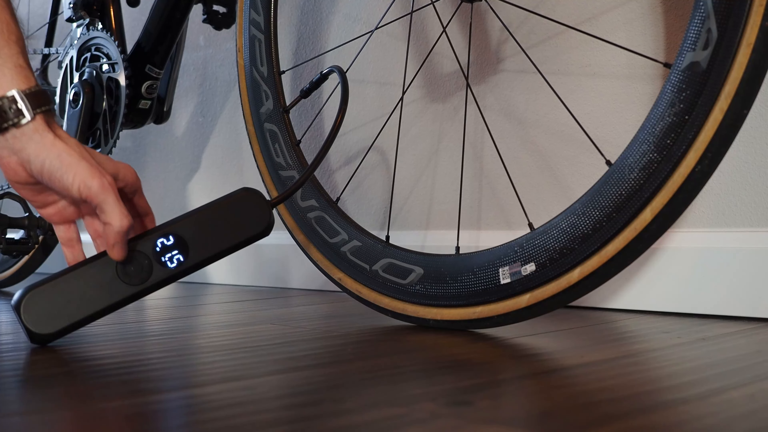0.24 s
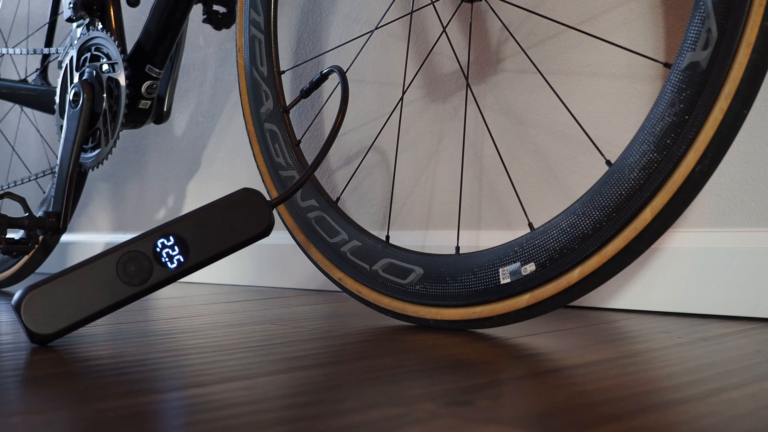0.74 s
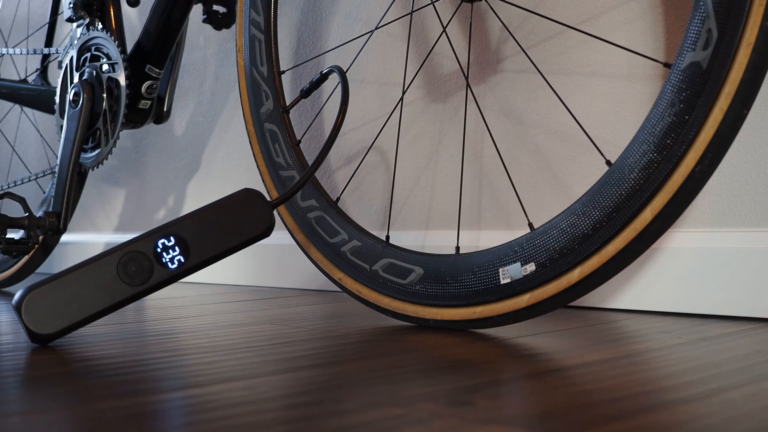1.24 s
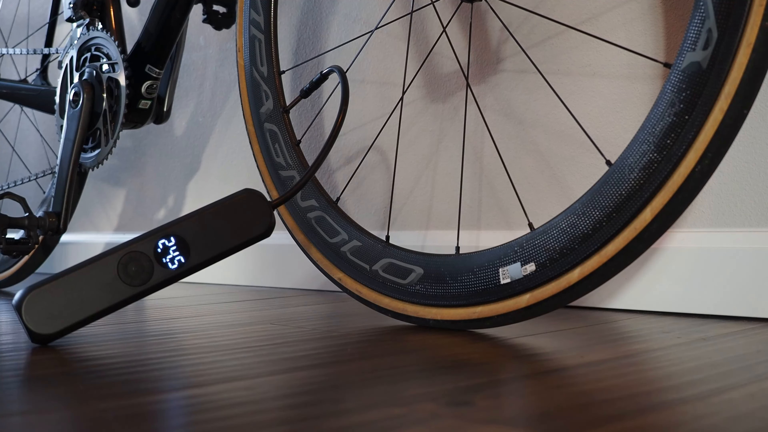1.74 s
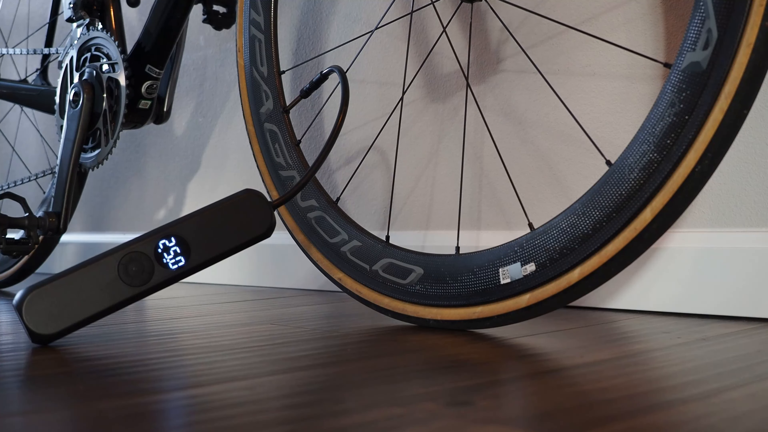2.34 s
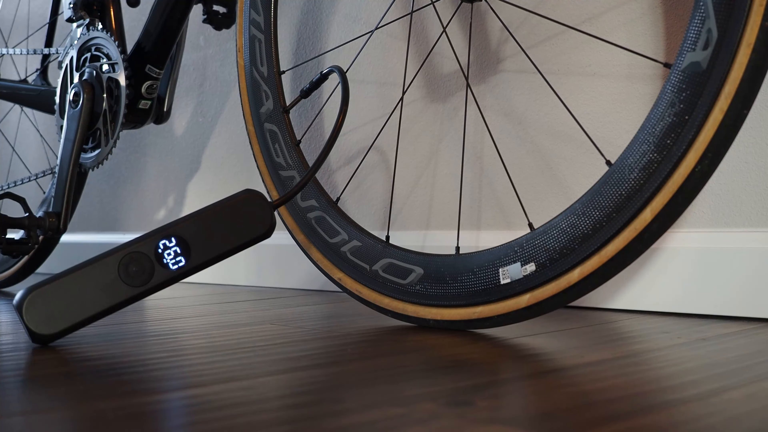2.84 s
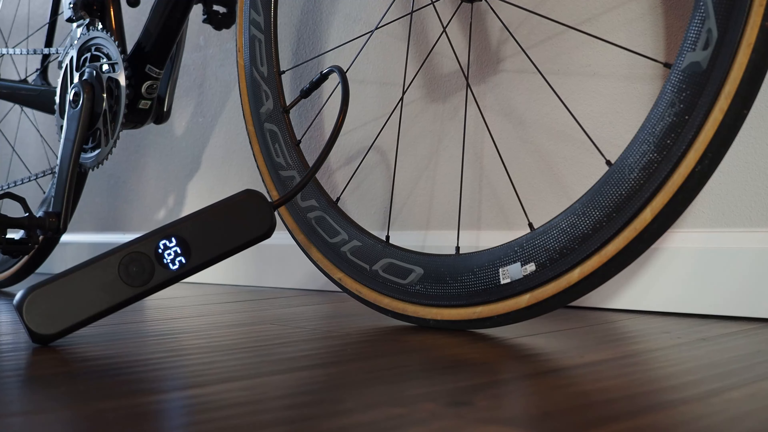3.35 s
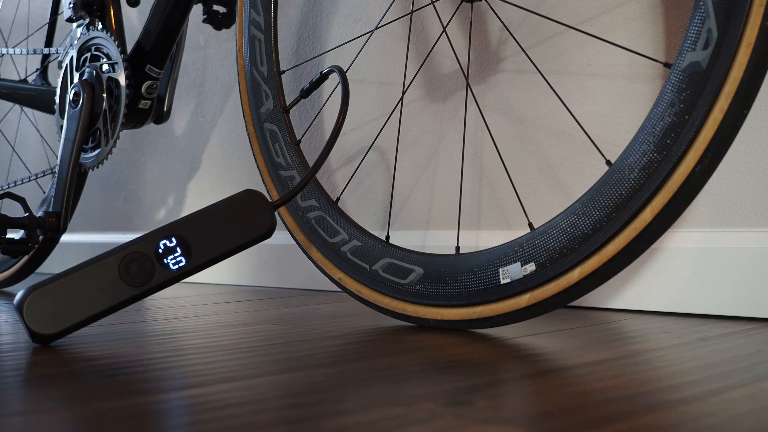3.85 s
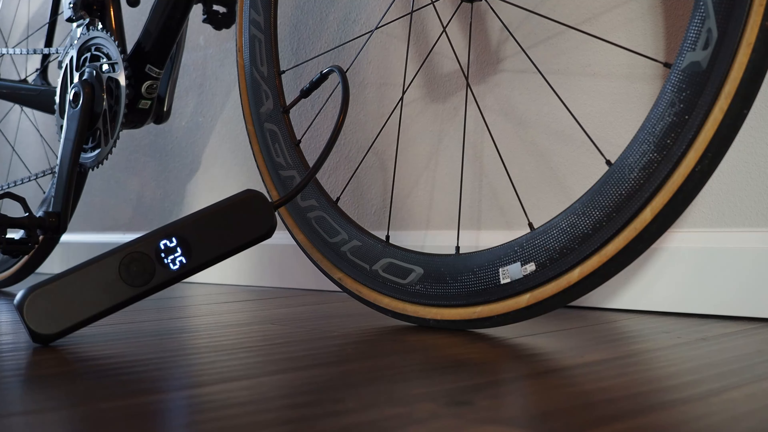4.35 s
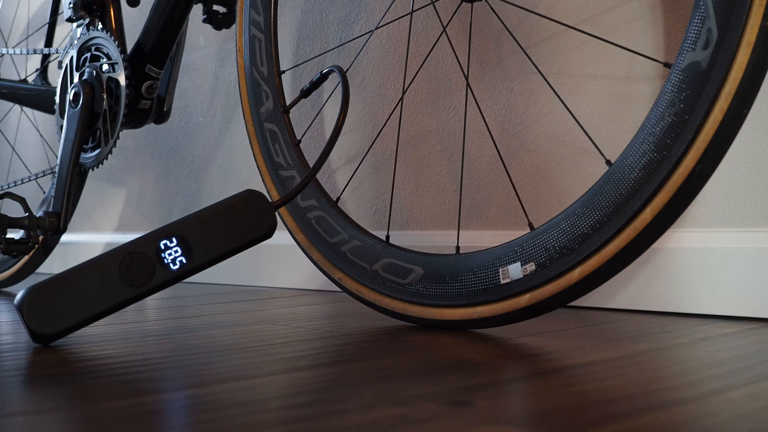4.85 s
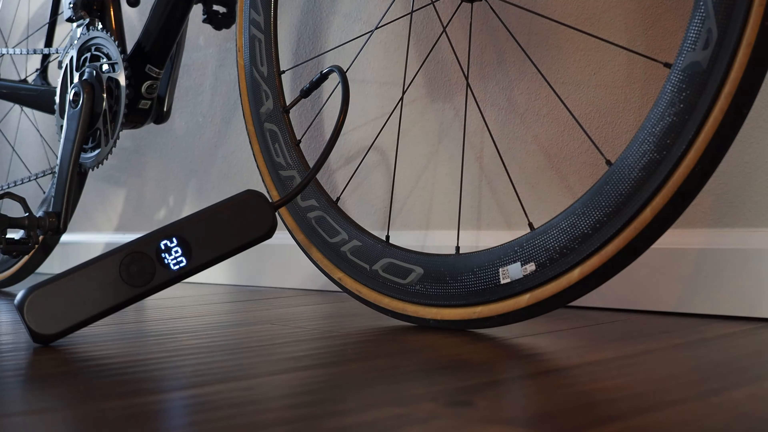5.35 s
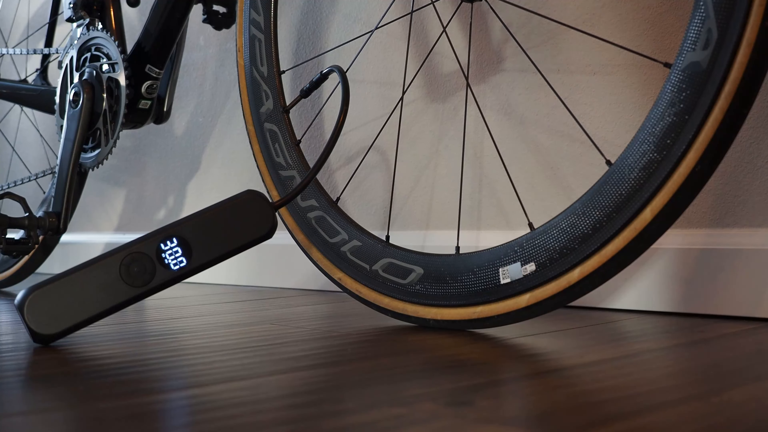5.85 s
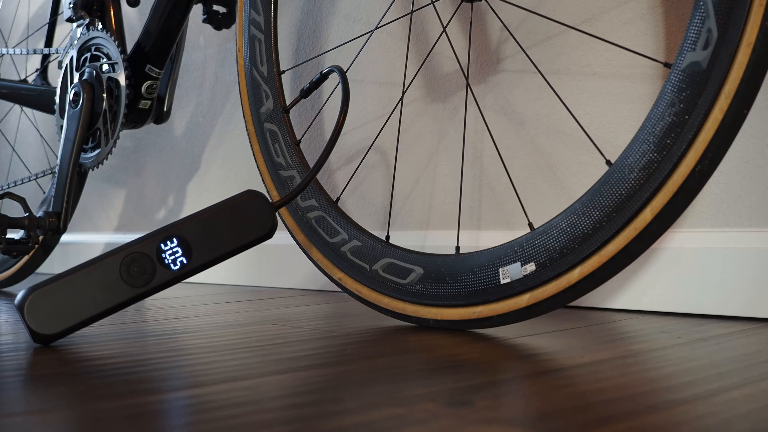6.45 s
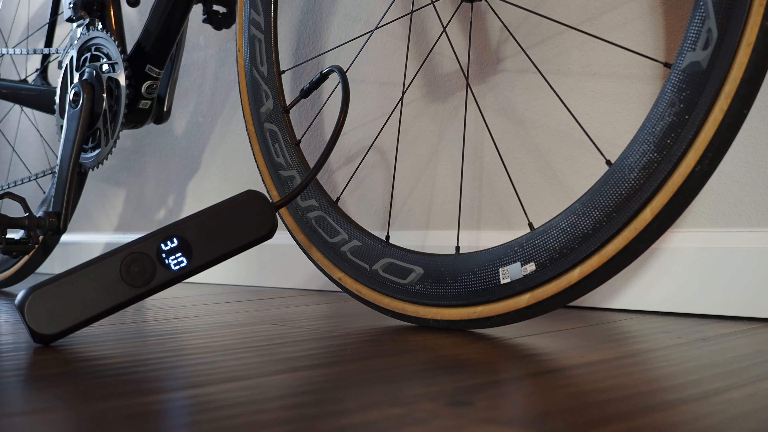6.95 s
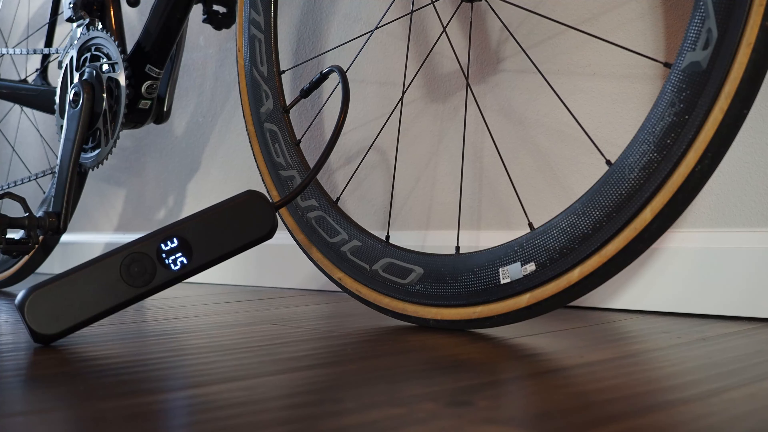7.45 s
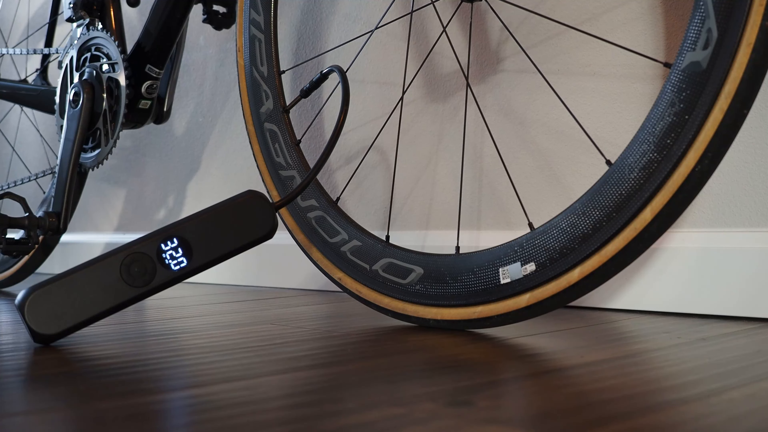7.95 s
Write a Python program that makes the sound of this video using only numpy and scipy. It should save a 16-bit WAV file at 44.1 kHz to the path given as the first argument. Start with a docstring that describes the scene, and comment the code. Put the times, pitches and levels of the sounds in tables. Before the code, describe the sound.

A small cordless tyre inflator runs steadily up close, a loud buzzing gear whine with rapid piston knocking, gritty grinding and airy hiss throughout.

```python
"""A whine swells and dips in pitch about 39 times a second: a cordless tyre inflator on a wooden floor fills a tyre.
Its motor drives a piston through a gear; each compression loads the teeth and bends the shaft speed.
The piston knocks in the plastic case, sliding parts grind, air hisses and whistles through the valves.
A hand lets go early on, which thins the drone of the case; dull low bumps and a floor of noise lie below."""
import sys
import numpy as np
from scipy import signal
from scipy.fft import rfft, irfft, next_fast_len
from scipy.io import wavfile
from scipy.ndimage import map_coordinates

SR = 44100
rng = np.random.default_rng(int(sys.argv[2]) if len(sys.argv) > 2 else 0)


def bounce(signal):
    """Save signal as a 16-bit WAV file at the path given by the first command-line argument."""
    frames = np.transpose(np.atleast_2d(signal))
    limited = np.clip(frames, -1, 1)
    pcm = np.round(limited * 32767).astype(np.int16)
    wavfile.write(sys.argv[1], SR, pcm)


N = 361619
TIME_S = np.arange(N) / SR

# crank speed: (time [s], speed [turns/s])
CRANK_SPEED = [(0.0, 39.751), (1.9, 38.545), (2.0, 37.904), (2.1, 38.52), (3.3, 38.707), (3.4, 39.016),
               (3.8, 38.402), (4.2, 39.027), (4.3, 38.482), (6.1, 38.464), (7.0, 38.568), (8.2, 38.254)]
# piston and rod knocks in each turn: (phase [turn], thud [dB], tick [dB]), levels relative
KNOCKS = [(.49, -6, 0), (.61, -6, -9), (.71, -5, -7), (.8, 0, -1), (.88, -6, -9)]
# case shaking before the effort tilt: (crank order, level [dB])
CASE_SHAKE = [(1, -57.5), (2, -52), (3, -61.5), (4, -54.5), (5, -52.5), (6, -63), (7, -57.5), (9, -58.5),
              (11, -51), (12, -50), (13, -58.5), (14, -54.5), (16, -53.5), (17, -53), (18, -47), (19, -51),
              (20, -51), (21, -47.5), (27, -42.5), (28, -43.5), (30, -44.5)]
# extra drone while the hand holds the case, untouched by the effort tilt: (crank order, level [dB])
GRIP_SHAKE = [(6, -55), (7, -49.5), (10, -54), (13, -50), (17, -54), (19, -46), (21, -46)]
# resonances: (frequency [Hz], width [Hz], relative level [dB])
GEARBOX_MODES = [(1353, 305, -4), (1404, 128, 3), (1580, 93, 1), (1845, 84, 4)]
CASE_MODES = [(679, 32.6, 0), (818, 63, -8), (925, 47, -1.5), (1085, 91, 3), (1182, 104, 0.5),
              (1331, 75, -4.5)]
# relative spectra: (frequency [Hz], density [dB/Hz])
GRIND_SPECTRUM = [(1800, 12), (2100, 6), (2380, -4.5), (2550, 3.5), (2820, -8), (3000, 3), (3280, 4.5),
                  (3530, -11.5), (3750, 2), (4050, -12), (4450, 2.5), (4950, -11), (5550, -2.5),
                  (6200, -36)]
AIR_SPECTRUM = [(2000, 6.5), (5500, 0.5), (6600, -8), (7600, 2), (8600, -2), (9300, 0.5), (10300, -6.5),
                (12000, -2), (13000, -2), (14000, -8), (15400, -2.5), (16000, -10)]
FLOOR_SPECTRUM = [(15, -3), (45, -2), (100, -17), (200, 4), (350, -0.5), (520, 2.5), (700, 2), (1100, 3.5),
                  (2000, -22)]
# how the case passes the whine and its overtones: (frequency [Hz], relative gain [dB])
WHINE_BODY = [(1250, 0.5), (1340, 10.5), (1460, -2.5), (1540, -2), (1650, -2), (1730, 0), (1820, 0),
              (1900, -4.5), (1980, -12), (2200, 6.5)]
OVERTONE_BODY = [(3100, -34), (3300, 13), (3600, -17), (4900, -9), (5350, 8.5), (5650, 4), (6000, -8)]
# dull bumps: (onset [s], envelope peak [dB], pitch [Hz])
BUMPS = [(1.95, -36, 40), (2.82, -35, 36.5), (2.96, -41, 42), (3.48, -38, 52), (4.021, -32, 49),
         (4.85, -39, 42), (6.06, -45, 60), (7.1, -44, 44), (7.62, -36, 48)]
# gear rebounds after compression: (phase [turn], width [turns], tooth load [dB], relative speed jolt [share])
REBOUNDS = [(0.719, 0.017, -22, 0.13), (0.861, 0.036, -18, -0.1)]
# level swells, one per turn: (phase [turn], width [turns], swing [dB])
VALVE_SWELL = (0.41, .14, 2.6)
INTAKE_SWELL = (0.33, 0.12, 5.6)

TEETH = 44
LET_GO_S, LET_GO_FADE_S = 0.7, 0.05
CUTOFF_HZ = 15650
# effort rises with tyre pressure and levels off
EFFORT_TAU_S = 1.6
GEARS_DB, GEARS_WAVER_DB = -15, 0.23
# level at full effort, and its rise up to there
KNOCK_DB, KNOCK_RISE_DB = -30.5, 4.0
GRIND_DB, GRIND_RISE_DB = -27, 10
AIR_DB, AIR_RISE_DB = -32.5, -3.5
# tooth load: compression peak, build-up around it, idling
PEAK_WIDTH_TURNS, BUILD_WIDTH_TURNS = 0.064, 0.17
PEAK_DB, BUILD_DB, IDLE_DB = -1.4, -15.5, -24.5
# shaft fast into compression, slow out of it; the largest deviation is 0.61 of the scale
SAG_AT_TURN, SAG_WIDTH_TURNS, SAG_SCALE = 0.52, 0.1424, 0.14
RATTLE_DUCK_DB = 1.5
# tilt per unit of effort; zero tilt at the reference effort, above full effort (1)
SHAKE_TILT_DB_PER_ORDER, SHAKE_REF_EFFORT = 0.2, 1.5
SHAKE_WAVER_DB = 1.67


def from_db(db):
    """Amplitude ratio of a level in dB."""
    return 10 ** (np.asarray(db) / 20)


def rms_one(x):
    """Scale to rms 1, over all channels together."""
    return x / np.sqrt(np.mean(x ** 2) + 1e-20)


def colour(x, spectrum):
    """Filter by a spectrum that falls steeply beyond its ends; rms 1."""
    hz, db = np.transpose(spectrum)
    size = next_fast_len(N)
    log_hz = np.log(np.maximum(np.fft.rfftfreq(size, 1 / SR), 1))
    outside = np.abs(log_hz - np.clip(log_hz, np.log(hz[0]), np.log(hz[-1])))
    gain = from_db(np.interp(log_hz, np.log(hz), db) - 100 * outside)
    return rms_one(irfft(rfft(x, size) * gain, size)[..., :N])


def resonate(x, modes):
    """Parallel two-pole resonances with alternating signs; rms 1."""
    out = 0
    for k, (hz, width_hz, db) in enumerate(modes):
        radius = np.exp(-np.pi * width_hz / SR)
        zeros = [(1 - radius ** 2) / 2, 0, (radius ** 2 - 1) / 2]
        poles = [1, -2 * radius * np.cos(2 * np.pi * hz / SR), radius ** 2]
        out = out + (-1) ** k * from_db(db) * signal.lfilter(zeros, poles, x)
    return rms_one(out)


def band(x, low_hz, high_hz):
    """Band-pass; rms 1."""
    sos = signal.butter(2, [low_hz, high_hz], "band", fs=SR, output="sos")
    return rms_one(signal.sosfilt(sos, x))


def drift(rate_hz):
    """Random values at the given rate, joined by straight lines; rms 1."""
    return rms_one(np.interp(TIME_S * rate_hz, np.arange(N), rng.standard_normal(N)))


def pan(x, left_minus_right_db):
    """Stereo pair with a level difference."""
    return x * from_db(np.array([[left_minus_right_db], [-left_minus_right_db]]) / 2)


def scatter(x, wet_db, t60_s):
    """Short spray of reflections off floor, wall and wheel, different at each side; rms 1."""
    age_s = np.arange(SR // 8) / SR
    spray = rng.standard_normal((2, len(age_s))) * from_db(-60 * age_s / t60_s)
    spray *= from_db(wet_db) / np.sqrt(np.sum(spray ** 2, axis=1, keepdims=True))
    paths = 1 + rfft(spray)
    paths /= np.abs(paths) ** .7  # flatten most of the colouring
    response = np.fft.fftshift(irfft(paths), axes=1)
    start = response.shape[1] // 2
    return rms_one(signal.fftconvolve(np.atleast_2d(x), response, axes=1)[:, start:start + N])


def rubbing(turns, repeat, channels=1):
    """Roughness noise: power share `repeat` recurs every turn, the rest is fresh in each channel."""
    surface = irfft(np.exp(2j * np.pi * rng.random(513)))
    position = turns % 1 * len(surface)
    worn = rms_one(map_coordinates(surface, [position], order=3, mode="wrap"))
    fresh = rng.standard_normal((channels, N))
    return np.sqrt(repeat) * worn + np.sqrt(1 - repeat) * fresh


def bell(turns, centre, width):
    """Gaussian swell of height 1, once per turn."""
    return np.exp(-.5 * (((turns - centre + .5) % 1 - .5) / width) ** 2)


def tooth_load(turns):
    """Relative force on the teeth: build-up, compression peak, rebounds."""
    load = from_db(IDLE_DB) + from_db(BUILD_DB) * bell(turns, 0.46, BUILD_WIDTH_TURNS)
    load = load + from_db(PEAK_DB) * bell(turns, 0.52, PEAK_WIDTH_TURNS)
    return load + sum(from_db(db) * bell(turns, at, width) for at, width, db, _ in REBOUNDS)


def shaft_speed(turn):
    """Relative speed within a turn: fast into compression, slow out, jolted by each rebound."""
    offset = (turn - SAG_AT_TURN) / SAG_WIDTH_TURNS
    sag = SAG_SCALE * offset * bell(turn, SAG_AT_TURN, SAG_WIDTH_TURNS)
    return 1 - sag + sum(jolt * bell(turn, at, width) for at, width, _, jolt in REBOUNDS)


def gear_whine(turns):
    """Teeth mesh at the momentary shaft speed; load sets the strength of the tone and two overtones."""
    grid = np.linspace(0, 1, 1000)
    travel = np.cumsum(shaft_speed(grid))
    shaft_turn = np.interp(turns % 1, grid, travel / travel[-1])
    mesh_rad = 2 * np.pi * TEETH * shaft_turn + .1 * drift(300)
    # load timing and strength waver
    load = tooth_load(turns + .005 * drift(30)) * from_db(.25 * drift(25))
    rough_rad = mesh_rad + .33 * drift(700)
    partials = from_db(-7.5) * np.sin(2 * rough_rad) + np.sin(3 * rough_rad)
    overtones = scatter(colour(load * partials, OVERTONE_BODY), wet_db=0, t60_s=.009)
    fundamental = colour(load * np.sin(mesh_rad), WHINE_BODY)
    return fundamental + from_db(-23.5 + .8 * drift(15)) * overtones


def gear_rattle(turns):
    """Worn teeth chatter in the gearbox, least while loaded."""
    level_db = -RATTLE_DUCK_DB * bell(turns, 0.4, .1)
    chatter = from_db(level_db + 1.5 * drift(40)) * rubbing(turns, repeat=.1)
    return scatter(band(resonate(chatter, GEARBOX_MODES), 1080, 2270), wet_db=-7, t60_s=0.033)


def knocks(turns, column, spread_db):
    """One click per table row and turn, uneven in strength and timing."""
    clicks, count = np.zeros(N), np.arange(int(turns[-1]) + 1)
    for row in KNOCKS:
        late, hard = rng.standard_normal((2, len(count)))
        at = np.interp(count + row[0] + .003 * late, turns, np.arange(N)).astype(int)
        clicks[at] += from_db(row[column] + spread_db * hard)
    clicks[[0, -1]] = 0  # drop clicks that fall outside
    return clicks


def piston(turns):
    """Knocks and sliding friction ring in the plastic case."""
    thuds = rms_one(knocks(turns, column=1, spread_db=2.5))
    drive = thuds + from_db(-2) * rubbing(turns, repeat=0.091)
    return scatter(band(resonate(drive, CASE_MODES), 600, 1390), wet_db=-7.5, t60_s=0.033)


def grind(turns, swell_db):
    """Friction noise, partly repeating each turn, swelling with the valve cycle."""
    friction = from_db(swell_db + .8 * drift(60)) * rubbing(turns, repeat=.42, channels=2)
    return colour(scatter(friction, wet_db=-3, t60_s=.03), GRIND_SPECTRUM)


def shake(turns, effort):
    """The unbalanced piston rocks the case at crank orders; the grip adds drone, effort brightens it."""
    held = np.clip((LET_GO_S - TIME_S) / LET_GO_FADE_S + .5, 0, 1)
    tilt_db = SHAKE_TILT_DB_PER_ORDER * (effort - SHAKE_REF_EFFORT)
    power = {round(order): from_db(db + tilt_db * order) ** 2 for order, db in CASE_SHAKE}
    for order, db in GRIP_SHAKE:
        power[round(order)] = power.get(round(order), 0) + held * from_db(db) ** 2
    out = 0
    for order, order_power in power.items():
        level = np.sqrt(2 * order_power) * from_db(SHAKE_WAVER_DB * drift(5))
        out = out + level * np.sin(2 * np.pi * (order * turns + rng.random()))
    return out


def air(turns, hiss_db, whistle_db):
    """Valve hiss with sharp ticks, and a breathy whistle on the intake stroke."""
    jet = from_db(hiss_db) * rubbing(turns, repeat=.25, channels=2)
    ticks = from_db(-8) * rms_one(knocks(turns, column=2, spread_db=2))
    hiss = colour(scatter(jet + ticks, wet_db=3, t60_s=.025), AIR_SPECTRUM)
    whistle_mode = [(11340, 480, 0)]
    whistle = resonate(resonate(rng.standard_normal((2, N)), whistle_mode), whistle_mode)
    whistle = rms_one(whistle * from_db(whistle_db + 1.3 * drift(25)))
    hiss = from_db(3.0 + .5 * drift(18)) * hiss
    return hiss + from_db(-4.5) * pan(whistle, left_minus_right_db=-4.0)


def bumps(rise_s):
    """Soft, very low thuds: sines with wandering phase that swell and die away."""
    out, wander_rad = 0, 1.35 * drift(40)
    for onset_s, db, hz in BUMPS:
        age_s = np.maximum(TIME_S - onset_s, 0)
        swell = (age_s / rise_s * np.exp(1 - age_s / rise_s)) ** 2
        out = out + from_db(db) * swell * np.sin(2 * np.pi * hz * age_s + wander_rad)
    return out


def noise_floor():
    """Steady low noise, mostly common to both sides."""
    common = rng.standard_normal(N)
    sides = from_db(-10.0) * rng.standard_normal((2, N))
    return from_db(-45.0) * colour(common + sides, FLOOR_SPECTRUM)


def scene():
    """Crank phase and effort drive gears, case and valves, over bumps and noise."""
    speed_s, turns_per_s = np.transpose(CRANK_SPEED)
    turns = np.cumsum(np.interp(TIME_S, speed_s, turns_per_s)) / SR + .5
    turns = turns + 0.0055 * drift(20)  # uneven motor
    effort = 1 - np.exp(-TIME_S / EFFORT_TAU_S)
    knock_db = KNOCK_DB + KNOCK_RISE_DB * (effort - 1)
    grind_db = GRIND_DB + GRIND_RISE_DB * (effort - 1)
    air_db = AIR_DB + AIR_RISE_DB * (effort - 1)
    valve_db, intake_db = [db * (bell(turns, at, width) - .5)
                           for at, width, db in (VALVE_SWELL, INTAKE_SWELL)]
    gears = gear_whine(turns) + from_db(-8.0) * gear_rattle(turns)
    gears = from_db(GEARS_DB + GEARS_WAVER_DB * drift(3.77)) * pan(gears, left_minus_right_db=-3.0)
    case = from_db(knock_db) * piston(turns) + from_db(grind_db) * grind(turns, valve_db)
    case = case + shake(turns, effort)
    valves = from_db(air_db) * air(turns, valve_db, intake_db)
    return gears + case + valves + bumps(rise_s=0.034) + noise_floor()


def record(dry):
    """Steep elliptic low-pass cuts the top."""
    sos = signal.ellip(12, .1, 90, CUTOFF_HZ, fs=SR, output="sos")
    return signal.sosfilt(sos, dry)


dry = scene()
out = record(dry)
bounce(out)
```